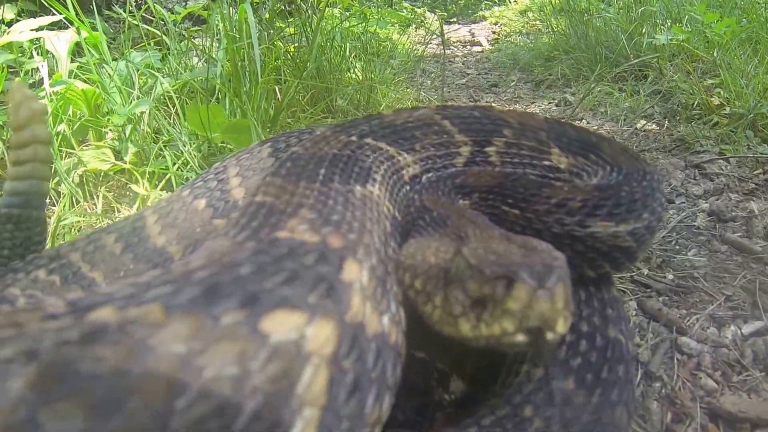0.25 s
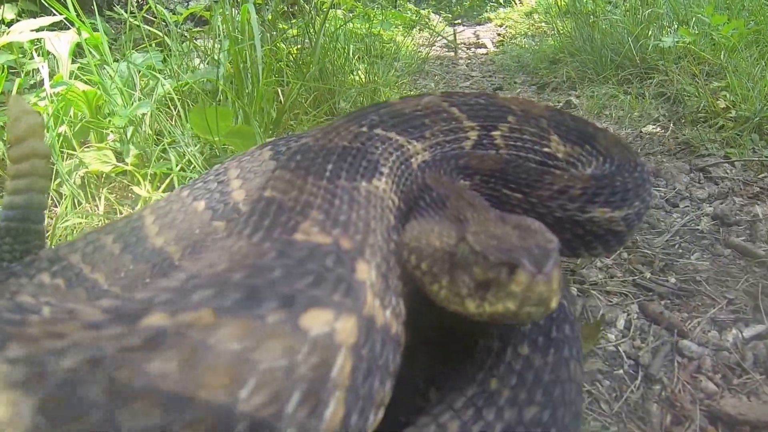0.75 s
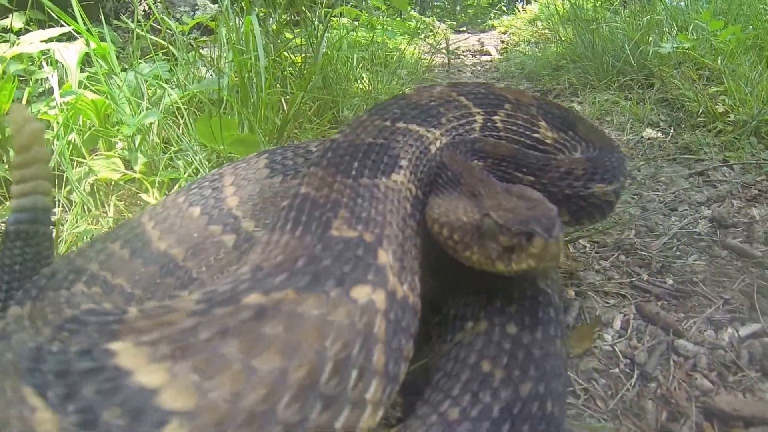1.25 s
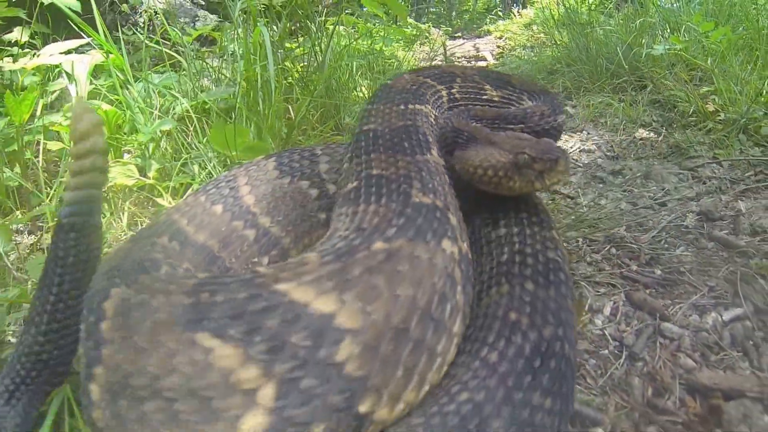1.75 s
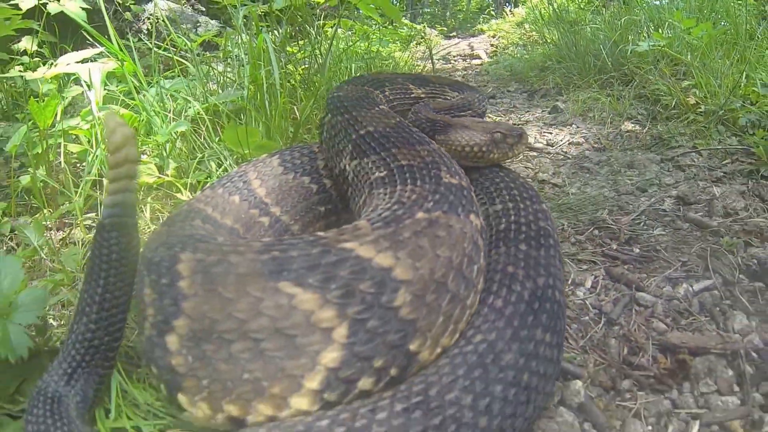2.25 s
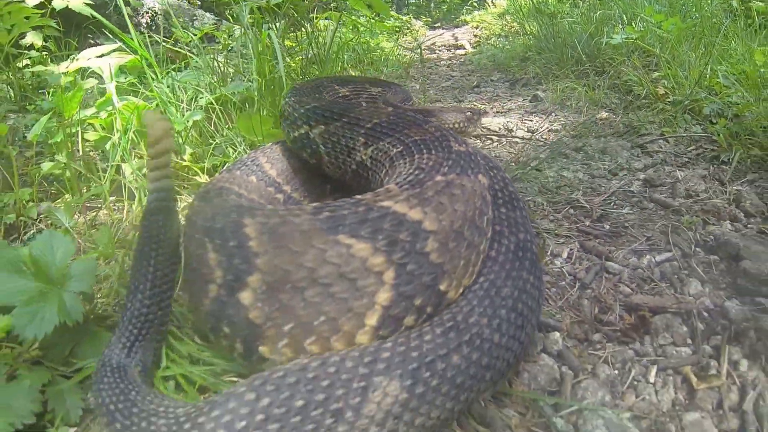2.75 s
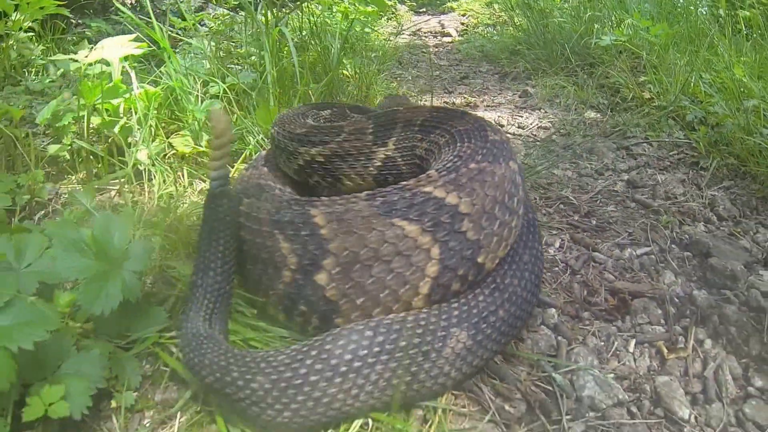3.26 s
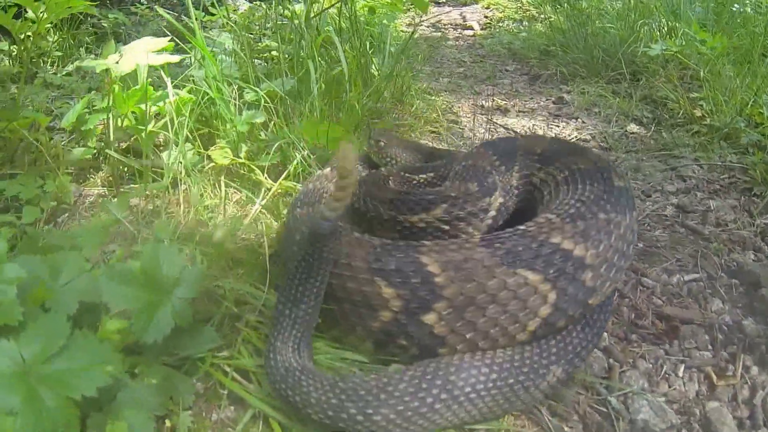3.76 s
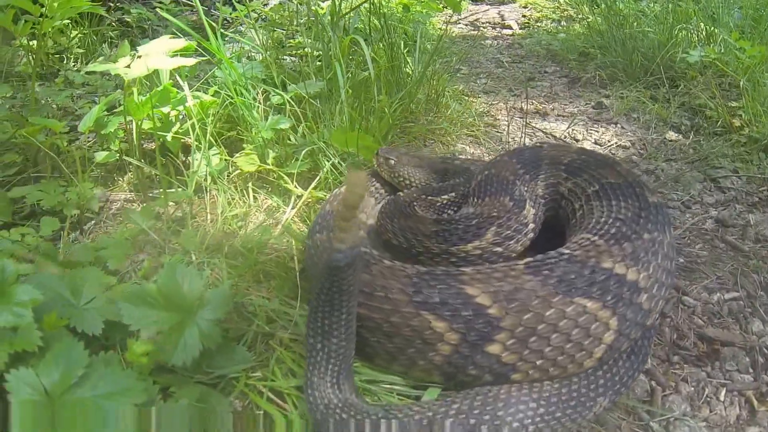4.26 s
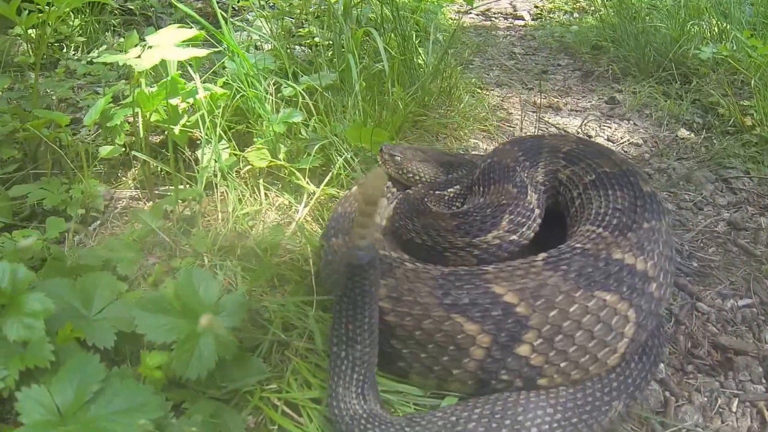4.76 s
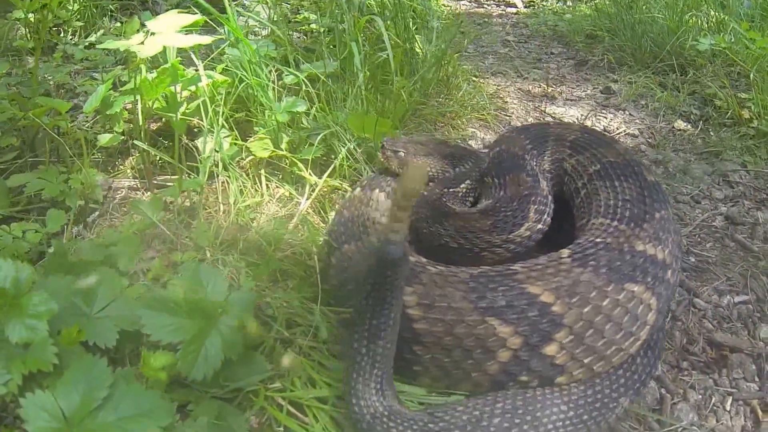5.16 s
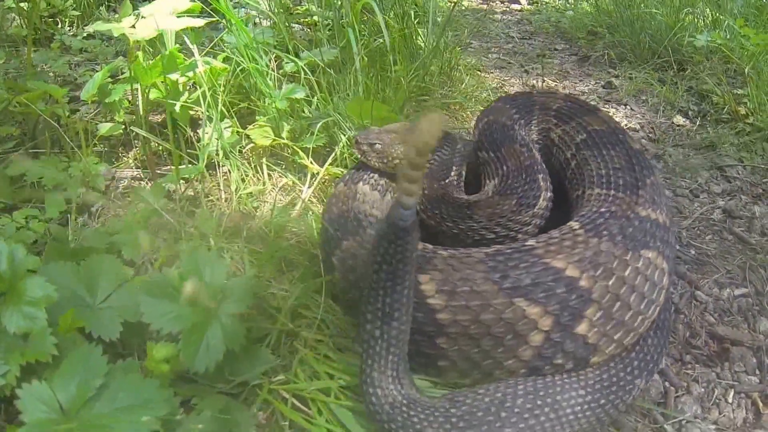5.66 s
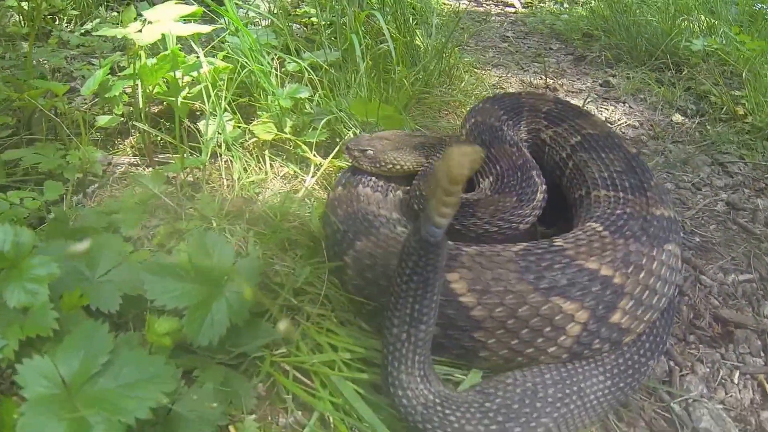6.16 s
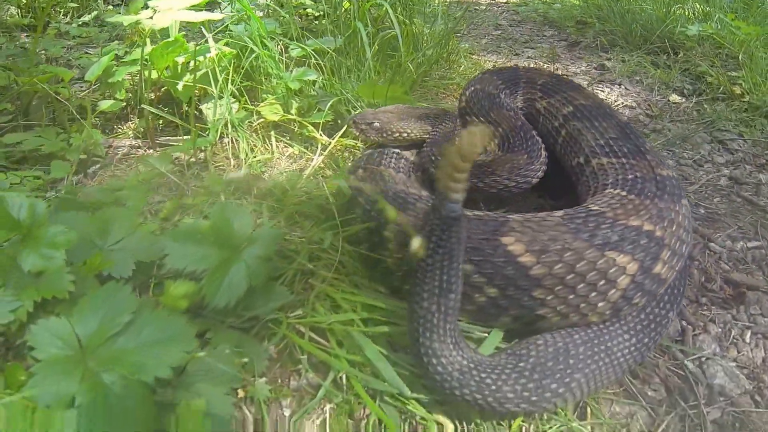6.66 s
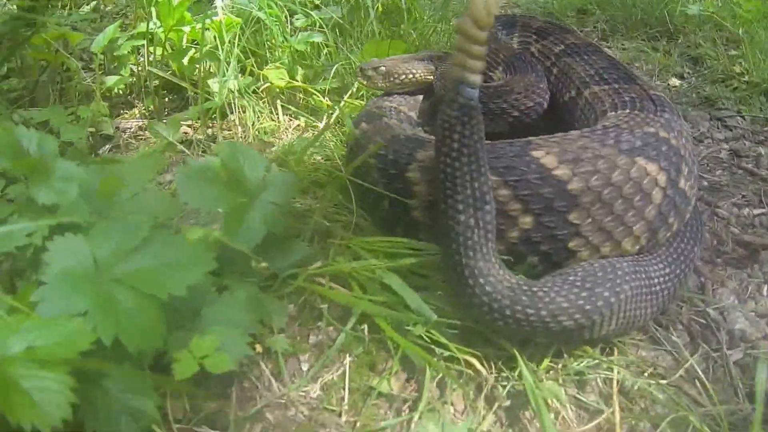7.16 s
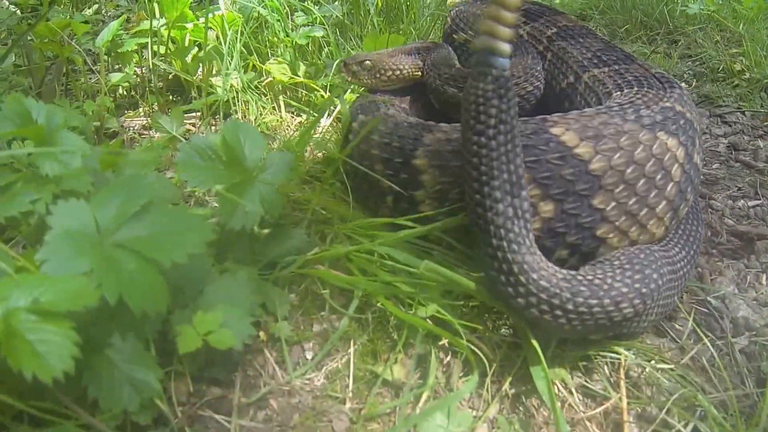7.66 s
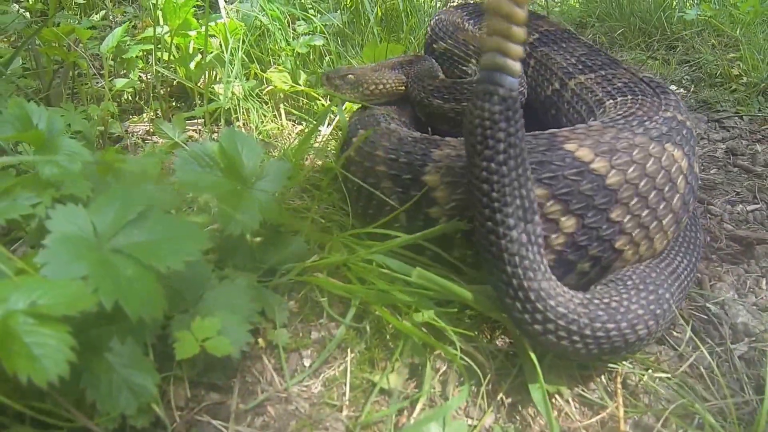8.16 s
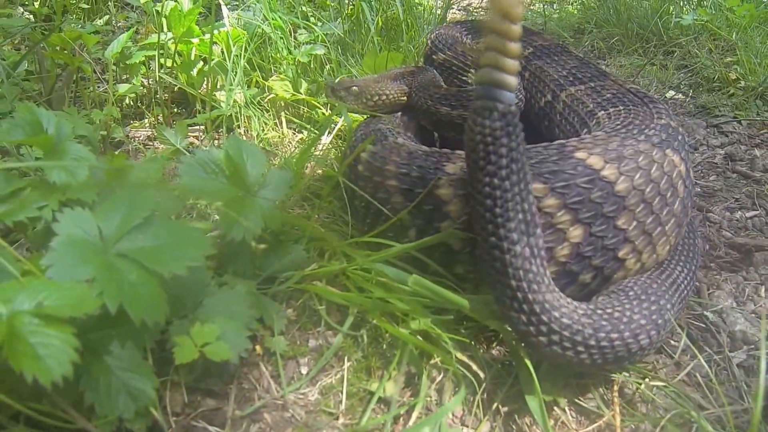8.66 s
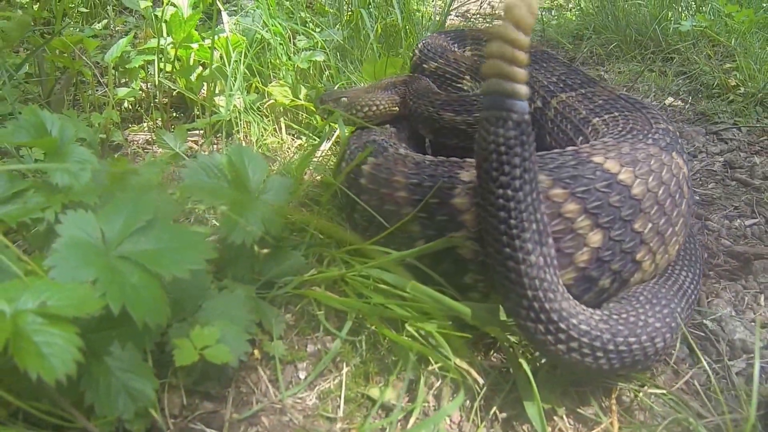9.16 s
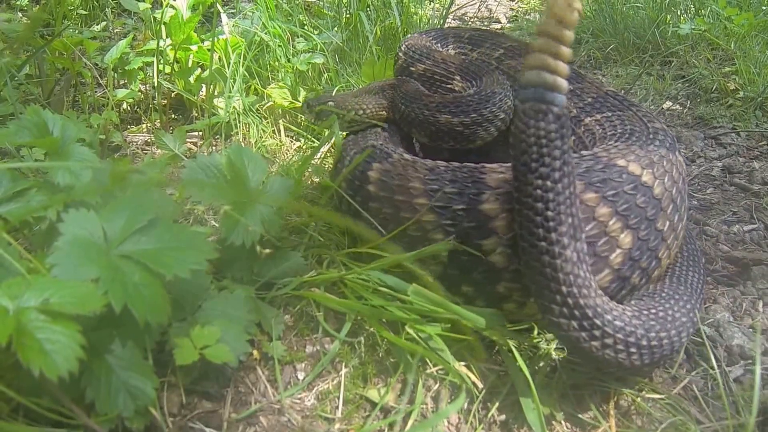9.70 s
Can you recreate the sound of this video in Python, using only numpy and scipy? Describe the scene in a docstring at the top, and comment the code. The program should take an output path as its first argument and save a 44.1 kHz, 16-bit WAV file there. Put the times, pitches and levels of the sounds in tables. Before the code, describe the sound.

Continuous dry, high rattlesnake buzz, heard through a plastic camera housing that knocks, rumbles and drags through crunching grass.

```python
"""A rattlesnake buzzes its tail a metre from a small camera sealed in a plastic housing on a pole.
From the start, dry segments click in bunches on every swing, over hollow taps and the pole's shiver.
At 1-3 s the shell drags through grass and stems snap; then the camera knocks in its loose mount as the
rattle grows. At 7-8 s come more grass and dull ground bumps, and one hard tap lands near the end.
The rattle is heard through the housing, every contact rings it, and faint hiss lies underneath."""
import sys
import numpy as np
from scipy import signal
from scipy.fft import rfft, irfft, next_fast_len
from scipy.io import wavfile
from scipy.ndimage import uniform_filter1d

SR = 44100
rng = np.random.default_rng(int(sys.argv[2]) if len(sys.argv) > 2 else 0)


def bounce(signal):
    """Save signal as a 16-bit WAV file at the path given by the first command-line argument."""
    frames = np.transpose(np.atleast_2d(signal))
    limited = np.clip(frames, -1, 1)
    pcm = np.round(limited * 32767).astype(np.int16)
    wavfile.write(sys.argv[1], SR, pcm)


N = 437913

# Shell modes in four groups: hollow, thud, bright, crisp
# (pitch [Hz], relative gain when knocked [dB], relative gain when rubbed [dB], t60 [s])
SHELL_MODES = [
    [(900, -9.5, -1, 0.0092), (1068, -0.5, -3.5, 0.0099), (1197, 3.5, -1, 0.024), (1302, -4.5, 0.5, 0.011)],
    [(143, -11, -11.5, 0.037), (247, -8.5, -4.5, 0.077), (312.5, -1, 1.5, 0.046), (383, -10, -5, 0.043),
     (608, -19, -9.5, 0.022)],
    [(1598, -1, -4, 0.017), (1713, -5, -7.5, 0.022), (2088, -25, -5.5, 0.012), (2418, -22, -10.5, 0.017)],
    [(2930, -0.5, 3, 0.0062), (3268, 0, 0, 0.0087), (3644, -4, -2, 0.015), (3947, -19.5, -5, 0.015),
     (5050, -22.5, -9, 0.015)],
]
# How hard the shell drags through grass (time [s], level [dB])
GRASS_DRAG = [(0, -51), (0.4, -49), (0.6, -42), (0.67, -33), (0.7, -38.5), (0.756, -51), (1.084, -49),
              (1.213, -32), (1.323, -28.5), (1.387, -38.5), (1.78, -21), (2.041, -26), (2.099, -42.5),
              (2.301, -27), (2.592, -28.5), (2.762, -43), (2.858, -37), (3.1, -45), (4.0, -44.5),
              (4.2, -51), (6.769, -59.5), (6.89, -44), (7.246, -42.5), (7.299, -27), (7.6, -33),
              (7.752, -25), (7.9, -33), (8.074, -23), (8.104, -49.5), (9.93, -50.5)]


def rattle():
    """Dry segments collide in bunches on each swing of the tail, fusing into a buzz."""
    # Tail speed (time [s], swing rate [Hz])
    tail_speed = [(0, 75), (1.5, 75), (2.5, 74.2), (3.5, 73.5), (4.6, 75.5), (5.6, 74), (6.8, 75),
                  (8, 74.5), (9.93, 73)]
    # Bunching of the clicks (bunches [per swing], depth [log rate], phase [rad])
    bunches = [(1, .2, .3), (2, .4, 1.2), (4, .45, 2.2)]
    # Loudness ride of the buzz (time [s], relative level [dB])
    ride = [(0, -41.5), (1.05, -40.5), (1.77, -41), (1.8, -46), (2.43, -45), (2.46, -51), (2.65, -46.5),
            (2.68, -52), (3.33, -43), (4.17, -39), (5.42, -38), (7.2, -37.5), (7.52, -39), (7.7, -36.5),
            (9.49, -36.5), (9.57, -40), (9.8, -36.5), (9.93, -37.5)]
    swing_hz = curves(tail_speed)[0] * (1 + .006 * walk(8))
    turn = 2 * np.pi * np.cumsum(swing_hz) / SR
    density = np.exp(sum(depth * np.cos(k * turn + phase) for k, depth, phase in bunches))
    strikes = clicks(per_s=5000 * density, scatter_db=0.41) * undb(0.31 * walk(25))
    buzz = through_housing(strikes)
    steady = buzz / np.sqrt(uniform_filter1d(buzz ** 2, size=SR // 3))
    return steady * undb(curves(ride)[0] - 1.0)


def through_housing(strikes):
    """The housing colours the clicks with peaks and notches whose strength follows the tail's bearing."""
    # Where the tail stands (time [s], pose [0-5])
    # 0 left edge, 1 swinging in, 2 ahead, 3 rising, 4 above, 5 above right
    tail_path = [(0, 0.01), (1.7, 0.05), (3.0, .5), (3.4, 0.81), (3.9, 1.47), (6.6, 2.5), (7.05, 2.7),
                 (7.4, 3.26), (7.9, 3.46), (9.3, 4.2), (9.6, 4.65), (9.93, 4.7)]
    # Resonances the rattle passes through (centre [Hz], width [Hz], gain in each of six poses [dB])
    resonances = [(3205, 490, -14, -20, -15.5, -15, -9, -9), (3703, 340, -2.5, 3.5, -7.5, 0.5, -0.5, 3.5),
                  (3930, 400, -7.5, -8.5, -2.5, -6, -6, -6), (4730, 710, -8, -6, -15, -9.5, -6, -2),
                  (5180, 394, 4.5, 2.5, 2, -10, -2, -1), (5695, 325, 6.5, 7.5, 6.5, 3.5, -0.5, 2),
                  (6200, 190, 6, -22, -3, 2.5, -2.5, -8), (6585, 360, 2.5, 0, 3, 1, -2.5, -3),
                  (7075, 440, 1, 0.5, -6, 5, 3.5, 6.5), (7667, 494, 2.5, 5, 7, 4, 5.5, 1),
                  (8040, 550, -22.5, 4.5, 0.5, -1, -5, -26), (8910, 1040, -5.5, -24, -29, -7.5, -27, -9),
                  (9840, 800, -14.5, -4.5, -10, -18, -17.5, -17),
                  (10900, 940, -17, -18, -24, -16, -13, -10),
                  (11500, 1300, -22, -14.5, -20.5, -21.5, -34, -16),
                  (13200, 1200, -14, -14, -19, -20, -19.5, -10), (14700, 900, -21, -22, -25, -22, -24, -27)]
    # Notches where two paths cancel (centre [Hz], width [Hz], share cancelled in each of six poses [0-1])
    notches = [(4450, 210, 0.62, 0.62, 0.57, .4, .3, .1), (5440, 97, 0.64, .3, 0.52, .3, .1, .1),
               (6070, 140, 0.89, .6, .6, .3, 0.5, .8), (6550, 130, .1, .1, .1, .6, .8, .3),
               (7170, 150, .1, .5, .7, .1, .1, .1), (8300, 190, .9, .1, .1, .1, .1, .1),
               (9200, 260, .1, .4, 0.74, .2, .3, .2)]
    pose, out = curves(tail_path)[0], 0
    for hz, width, *pose_db in resonances:
        gain_db = np.interp(pose, range(6), pose_db) + 0.14 * walk(3.17)
        varied = strikes * rng.standard_normal(N)  # every click gets its own colour
        out = out + undb(gain_db) * band(varied, hz, width)
    for hz, width, *shares in notches:
        depth = np.interp(pose, range(6), shares)
        out = out - depth * signal.lfilter(*signal.iirpeak(hz, hz / width, fs=SR), out)
    return out


def housing():
    """Knocks and scraping ring the same plastic shell; each contact favours other modes."""
    # Attack softness of the hollow, thud, bright and crisp groups (sharpness of the contact filter [Q])
    softness = [3.13, 1.16, 2.8, 2.07]
    cutoff_hz, out = 4750, 0
    knocks = blows(mount_knocks() + shell_taps() + stem_snaps() + ground_bumps())
    for modes, q, knock, scrape in zip(SHELL_MODES, softness, knocks, grass_scrape()):
        for hz, knocked_db, rubbed_db, t60 in modes:
            struck = undb(knocked_db + 2.66 * walk(30)) * knock
            rubbed = undb(rubbed_db - 18.5) * scrape * rng.standard_normal(N)
            # a soft contact feeds the mode over a cycle or two
            contact = signal.iirpeak(hz, q, fs=SR)
            force = signal.lfilter(*contact, signal.lfilter(*contact, struck + rubbed))
            out = out + ring(force, hz, t60)
    return signal.sosfilt(signal.butter(4, cutoff_hz, fs=SR, output="sos"), out)


def blows(contacts):
    """Force on each mode group: a short contact is one tick, a long one a crunch of many."""
    length = 2500
    age_ms = 1000 * np.arange(length) / SR
    force = np.zeros((4, N + length))
    strongest = [max(modes, key=lambda mode: mode[1]) for modes in SHELL_MODES]
    # Contacts (time [s], hollow [dB], thud [dB], bright [dB], crisp [dB], contact [ms])
    for s, *group_db, ms in contacts:
        crunch = 0.079 * rng.standard_normal((4, length)) * np.exp(-(age_ms / (ms + 1.9)) ** 2)
        crunch[:, 0] += 1.25 * np.exp(-ms / 5.7)  # the opening tick
        # scale each group by how far the crunch swings its strongest mode
        peaks = [np.abs(ring(c, hz, t60)).max() for c, (hz, _, _, t60) in zip(crunch, strongest)]
        start = int(s * SR)
        force[:, start:start + length] += (undb(group_db) / peaks)[:, None] * crunch
    return force[:, :N]


def mount_knocks():
    """The shaking pole knocks the camera in its loose mount; it falls back with a softer tick."""
    # Knocks in the mount (time [s], level [dB])
    knocks = [(0.214, -22.5), (1.057, -29), (1.246, -30), (1.423, -21.5), (1.516, -19.5), (1.559, -22),
              (1.64, -14.5), (2.151, -13.5), (2.54, -15), (3.016, -22), (3.28, -24), (3.39, -17.5),
              (3.419, -24), (3.49, -17), (3.521, -23.5), (3.611, -19.5), (3.705, -16.5), (3.809, -19.5),
              (3.867, -19.5), (3.962, -14.5), (3.989, -22.5), (4.08, -24), (4.329, -23), (4.688, -20.5),
              (4.792, -17), (4.894, -19.5), (4.988, -18.5), (5.104, -29.5), (5.312, -34), (5.472, -34.5),
              (5.956, -35), (6.22, -34), (6.39, -37), (6.478, -27), (9.095, -25), (9.658, -28.5),
              (9.737, -30.5)]
    rebound_s, rebound_db = 0.016, -14
    rebounds = [(s + rebound_s, db + rebound_db) for s, db in knocks]
    return [(s, db, db - 4.5, db - 1.5, db - 22, 2.2) for s, db in knocks + rebounds]


def shell_taps():
    """Quick taps ring the hollow modes, with hardly any thud."""
    # Taps on the shell (time [s], hollow level [dB], bright level [dB])
    taps = [(0.078, -13.5, -21), (0.14, -10, -22.5), (0.37, -10.5, -22), (0.392, -26, -28),
            (0.892, -24.5, -25), (0.972, -25, -37), (1.261, -34, -32), (1.478, -22, -38),
            (2.525, -18, -15.5), (2.824, -15, -19), (2.904, -11.5, -23), (2.932, -30, -27),
            (2.993, -18, -27), (3.373, -28, -35), (3.64, -36, -40), (4.618, -21.5, -42), (4.866, -25, -37),
            (5.399, -29, -42), (6.307, -33.5, -39.5), (7.406, -16, -14), (7.458, -7, -16),
            (8.05, -10.5, -25), (8.255, -35, -39), (8.364, -27.5, -37), (8.587, -11, -18),
            (8.915, -34.5, -37.5), (9.056, -10.5, -15.5), (9.536, -2.5, -5)]
    return [(s, db, db - 20, bright, db - 26, 1.4) for s, db, bright in taps]


def stem_snaps():
    """Stems snap and crunch against the shell."""
    # Breaking stems (time [s], hollow level [dB], crisp level [dB], contact [ms])
    snaps = [(0.483, -25, -29, .7), (0.524, -28, -32, .7), (0.585, -45, -31, .7), (0.685, -22.5, -27, 3.4),
             (0.741, -33, -34.5, 3.4), (1.322, -20, -24, 8.2), (1.352, -19.5, -21.5, .7),
             (1.726, -14, -26, .7), (1.746, -9.5, -22, 12), (1.871, -8.5, -11.5, 8.6),
             (1.975, -17.5, -20, 8), (2.006, -28, -35, .7), (2.025, -13, -21.5, 2.5),
             (2.207, -17.5, -24, .7), (2.236, -5, -16.5, 0.64), (2.246, -15, -22, 2), (2.286, -16, -18, .7),
             (2.301, -19, -24, .7), (2.313, -9.5, -15, 4.6), (2.324, -8, -11.5, 2.3),
             (2.375, -11, -13.5, 0.82), (2.415, -13, -12.5, 0.77), (2.433, -4, -18, .8),
             (2.602, -8.5, -17, 1.9), (2.614, -7, -29, 2), (2.657, -17, -29, .7),
             (2.671, -3.5, -24.5, 0.77), (2.744, -18.5, -23, .7), (6.856, -35, -31.5, 0.76),
             (7.329, -28, -14.5, 0.79), (7.356, -8, -36, 9.7), (7.441, -21, -22.5, 11),
             (7.716, -19, -20.5, 6), (7.756, -14, -13.5, 2.1), (8.026, -13, -18.5, .7),
             (8.066, -25, -24, 7.7), (8.449, -25, -18.5, 0.78), (9.207, -34, -37, 2.5),
             (9.451, -28, -40, 25), (9.723, -37, -29, 1.7), (9.788, -28.5, -30, 5.9)]
    return [(s, db, db - 7.5, db - 2, crisp, ms) for s, db, crisp, ms in snaps]


def ground_bumps():
    """The shell meets the ground with a dull thud."""
    # Bumps (time [s], thud level [dB], hollow level [dB])
    bumps = [(0.356, -16, -30), (1.133, -22, -23.5), (1.197, -19, -26), (1.307, -20, -29),
             (1.449, -19, -24), (1.688, -12, -24), (1.786, -8.5, -31), (1.801, -12.5, -14),
             (2.582, -18, -16), (2.838, -20, -22), (6.996, -21, -36), (7.283, -5.5, -6.5),
             (7.293, -0.5, -6), (7.551, -21, -28), (7.715, -9, -23), (7.741, -11, -12), (7.888, -5.5, -5),
             (7.935, -8.5, -19.5), (8.004, -8.5, -12), (9.121, -23, -34.5), (9.268, -17.5, -37),
             (9.351, -20.5, -28), (9.763, -23, -30)]
    return [(s, hollow, thud, hollow - 8.5, hollow - 16, 3.63) for s, thud, hollow in bumps]


def grass_scrape():
    """Stems catch and slip on the shell: sparse ticks at a light touch, dense flurries when pressed."""
    colour_db = np.array([[0], [-7], [-1.5], [-11]])  # hollow, thud, bright, crisp
    press_db = curves(GRASS_DRAG)[0]
    per_s = np.minimum(1500 * undb(.55 * (press_db + 34)), 2000)
    ticks = clicks(per_s * undb(6 * walk(40)), scatter_db=4.2)
    friction = unit(ticks / np.sqrt(per_s)) + 0.18  # a smooth rub under the ticks
    patchy_db = [3.73 * walk(14) for _ in SHELL_MODES]
    return friction * undb(press_db + colour_db + patchy_db)


def pole_shiver():
    """The hand-held pole wobbles, shaking the microphone with sub-bass; jerks and dragging add rumble."""
    # Shiver of the pole (time [s], level [dB])
    ride = [(0, -32), (0.9, -28), (1.44, -24), (1.77, -11), (2.07, -22.5), (2.54, -28), (3.4, -26),
            (4.04, -18.5), (4.84, -27), (5.6, -23.5), (6.8, -27), (7.1, -22.5), (7.24, -22.5), (7.33, -13),
            (7.55, -12), (7.71, -21), (8.8, -27.5), (9.93, -25)]
    # Sub-bass tone of the shiver (frequency [Hz], relative density [dB])
    tone = [(2.9, -18), (5.0, -13), (21, 4.5), (35, 1), (52, -9), (61, -16), (65, -14), (70, -20),
            (91, -47), (150, -120)]
    # Jerks of the pole (time [s], relative level [dB])
    jolts = [(0.08, -31), (0.362, -29), (1.22, -33), (1.77, -34), (1.99, -37), (2.46, -38), (2.709, -23),
             (3.65, -33), (7.03, -26), (7.3, -20.5), (7.47, -27), (7.71, -24), (7.88, -17.5), (8.03, -14.5),
             (9.12, -27.5), (9.3, -23), (9.79, -24.5)]
    rise_s, fall_s, wobble_db = .025, 0.043, 1.5
    t = np.arange(N) / SR
    jerks = sum(undb(db) * np.exp(-((t - s) / np.where(t < s, rise_s, fall_s)) ** 2) for s, db in jolts)
    sway = undb(curves(ride)[0] + wobble_db * walk(9))
    sub = coloured(tone)
    sub = sub / np.sqrt(uniform_filter1d(sub ** 2, size=SR // 8))
    rumble = unit(band(rng.standard_normal(N), hz=68.2, width=62) * undb(1.67 * walk(12)))
    rumble_gain = undb(-25.5) * sway + undb(curves(GRASS_DRAG)[0] - 4.5) + jerks
    return (sway + undb(1.5) * jerks) * sub + rumble_gain * rumble


def hiss():
    """A faint, steady bed of dark noise."""
    # Tone of the bed (frequency [Hz], relative density [dB])
    tone = [(60, 5.5), (200, -8), (600, -2), (2500, -8), (9000, -27), (15000, -37)]
    return undb(-59.5) * coloured(tone)


def undb(db):
    return 10 ** (np.asarray(db) / 20)


def unit(x):
    return x / np.sqrt(np.mean(x ** 2))


def curves(table):
    """Columns of a table joined by straight lines in time, one value a sample."""
    times, *columns = np.transpose(table)
    return [np.interp(np.arange(N) / SR, times, column) for column in columns]


def ring(x, hz, t60):
    """One decaying mode; a unit impulse starts it at amplitude 1."""
    r, w = np.exp(-np.log(1000) / (t60 * SR)), 2 * np.pi * hz / SR
    return signal.lfilter([0, np.sin(w)], [1, -2 * r * np.cos(w), r * r], x)


def band(x, hz, width):
    """Steep-sided resonance."""
    edges = [hz - width / 2, hz + width / 2]
    return signal.sosfilt(signal.butter(2, edges, "bandpass", fs=SR, output="sos"), x)


def coloured(tone):
    """Noise of rms 1, shaped by points of (frequency [Hz], relative density [dB])."""
    hz, db = np.transpose(tone)
    size = next_fast_len(N)
    log_hz = np.log(np.fft.rfftfreq(size, 1 / SR) + 0.14)
    gain = undb(np.interp(log_hz, np.log(hz), db))
    return unit(irfft(rfft(rng.standard_normal(size)) * gain, size)[:N])


def walk(rate):
    """Smooth drift of rms 1: random levels held 1 / rate s and slewed twice."""
    hold = int(SR / rate)
    steps = np.repeat(rng.standard_normal(N // hold + 1), hold)
    return unit(uniform_filter1d(uniform_filter1d(steps, hold), hold)[:N])


def clicks(per_s, scatter_db):
    """Random impulses of uneven size at a mean rate that may move."""
    fires = rng.random(N) < per_s / SR
    return fires * undb(scatter_db * np.minimum(rng.exponential(size=N), 4))


def scene():
    """Rattle, ringing shell, pole and hiss in one mono mix."""
    return (rattle() + housing() + pole_shiver() + hiss())[None]


def record(dry):
    """The loudest peaks round off and the top is cut steeply."""
    top_hz = 15260
    rounded = 1.6 * np.tanh(dry / 1.6)
    return signal.sosfilt(signal.ellip(14, .3, 70, top_hz, fs=SR, output="sos"), rounded)


dry = scene()
out = record(dry)
bounce(out)
```